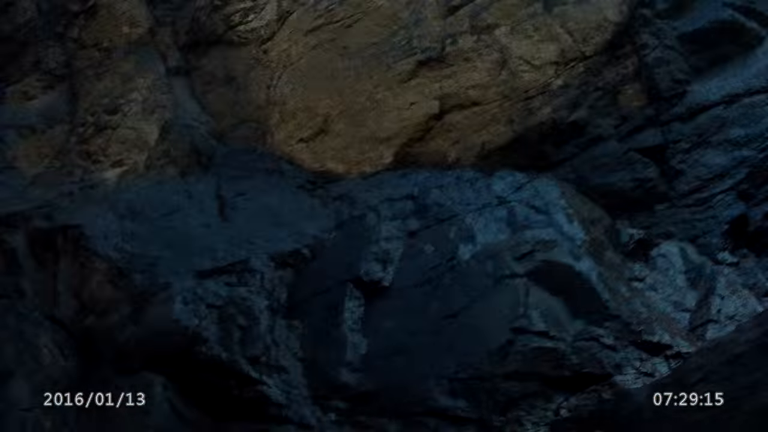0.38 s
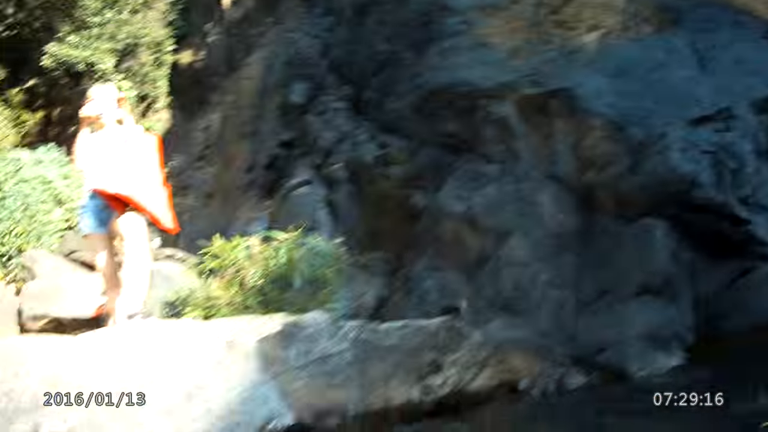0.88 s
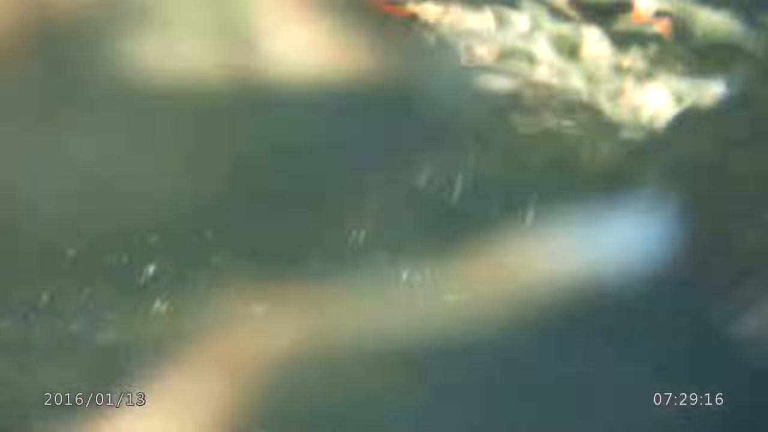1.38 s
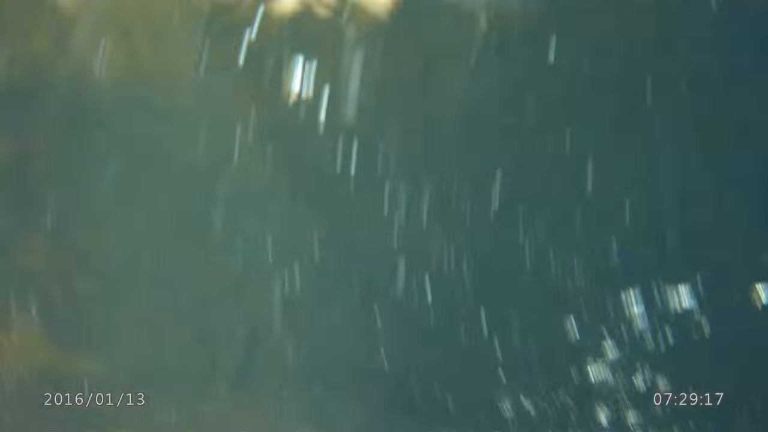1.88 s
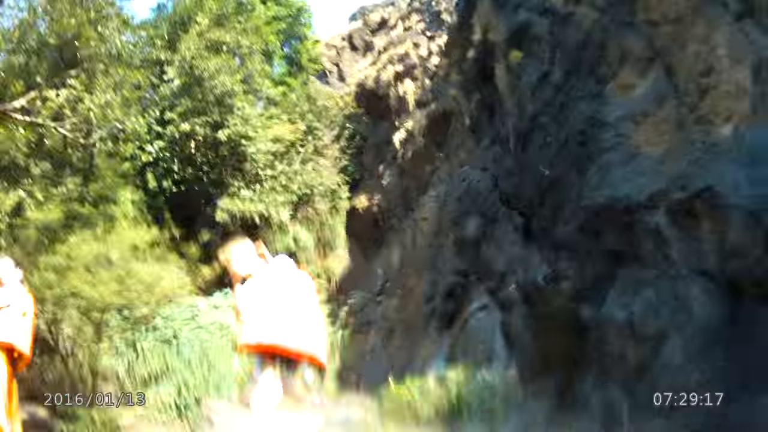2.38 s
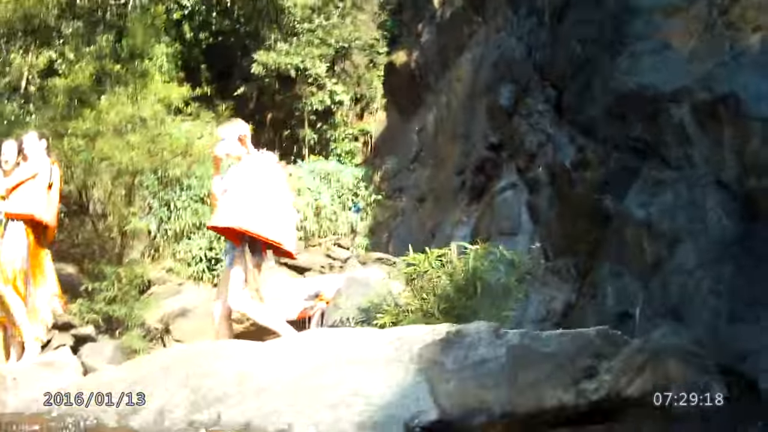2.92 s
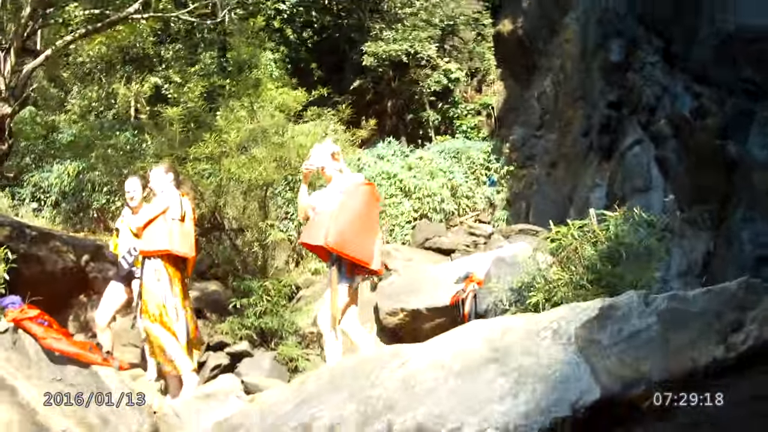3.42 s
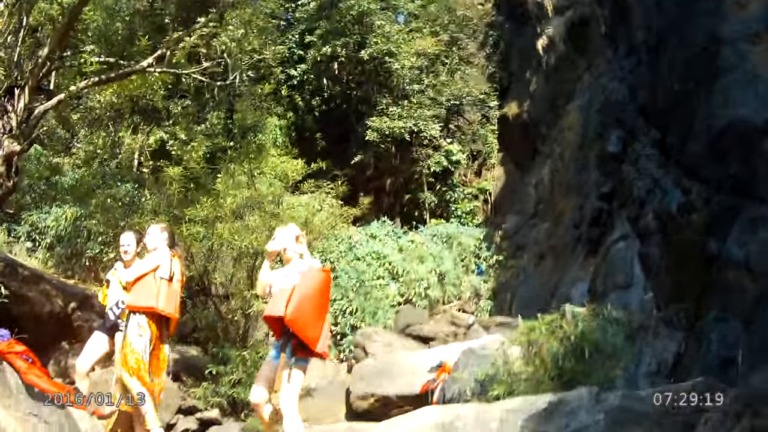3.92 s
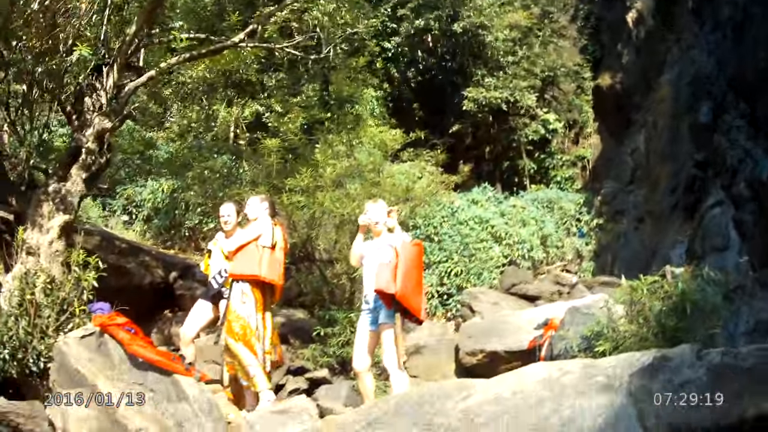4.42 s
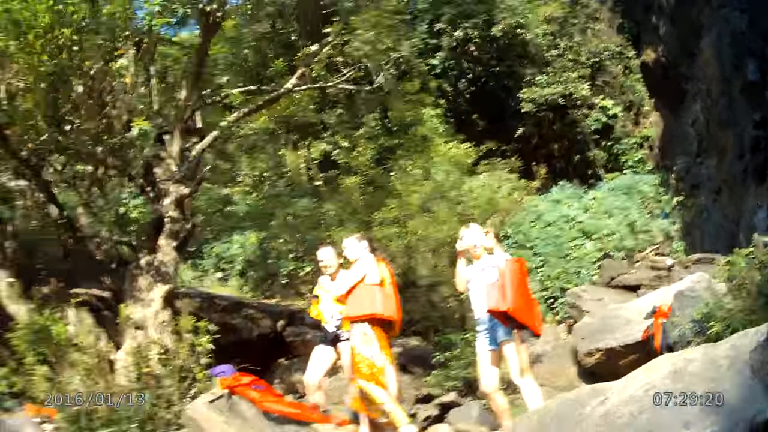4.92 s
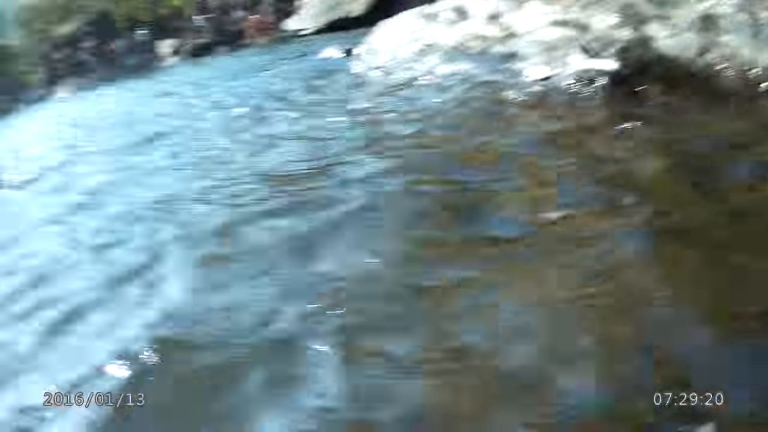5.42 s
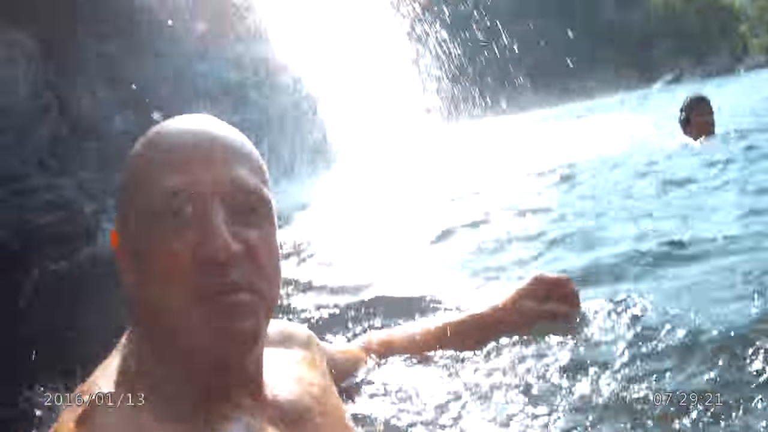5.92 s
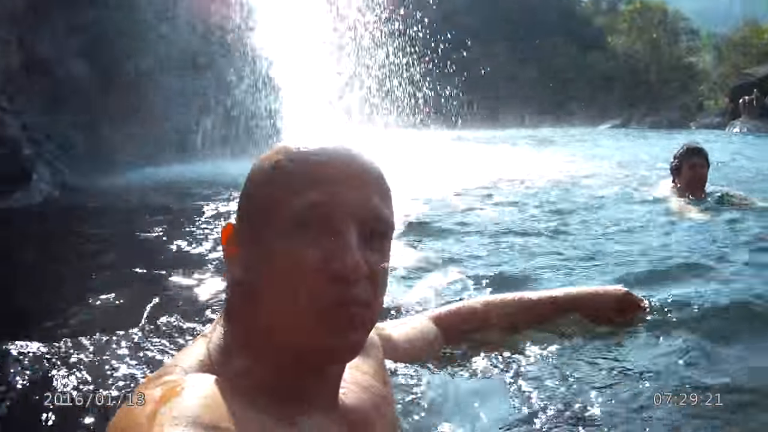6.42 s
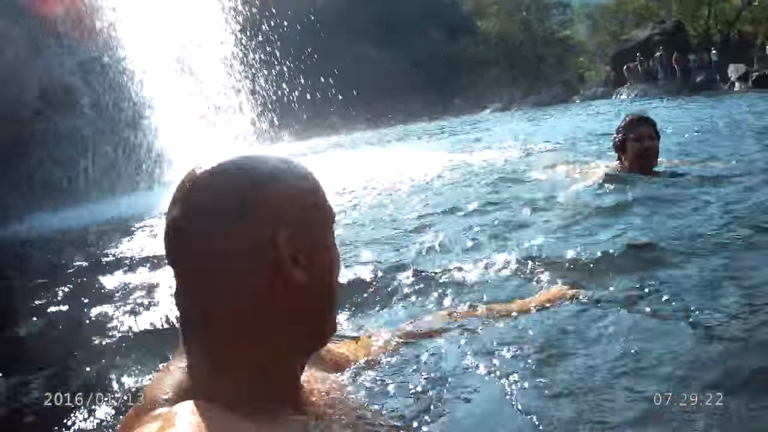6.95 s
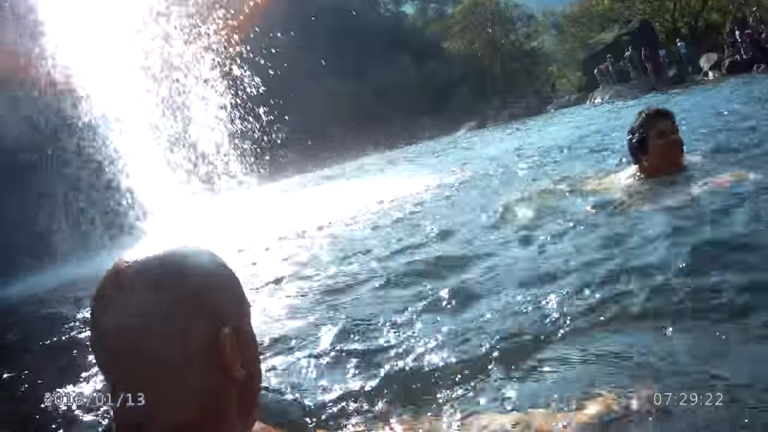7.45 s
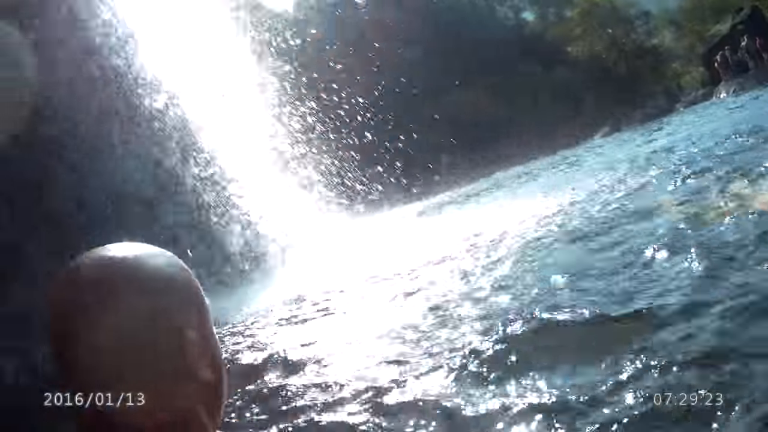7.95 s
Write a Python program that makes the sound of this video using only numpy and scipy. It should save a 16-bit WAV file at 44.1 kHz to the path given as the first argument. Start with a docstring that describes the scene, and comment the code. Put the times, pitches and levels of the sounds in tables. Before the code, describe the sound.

A waterfall roars steadily through a sealed camera case, which dips underwater in distorted gurgling bubbles, surfaces, then gets knocked and slapped by wavelets.

```python
"""A waterfall roars at a small camera in a sealed case, held at the surface of a pool.
The camera dips under for a second among bubbles, the hand shifts on the case, and it turns to face the fall.
The fall is shaped noise, water is crowds of dying sines, and drops and fingers are bursts and rings.
The case colours the fall, the fizz and the cracks with its resonances; the one microphone overloads hard."""
import sys
import numpy as np
from scipy import signal
from scipy.io import wavfile
from scipy.ndimage import uniform_filter1d

SR = 44100
rng = np.random.default_rng(int(sys.argv[2]) if len(sys.argv) > 2 else 0)


def unload_audio(sound):
    """Save the sound as a 16-bit wav file, at the path given as the first command line argument."""
    columns = np.transpose(np.atleast_2d(sound))
    # keep every value between -1 and 1, then stretch to whole-number steps
    steps = np.round(np.clip(columns, -1, 1) * 32767)
    wavfile.write(sys.argv[1], SR, steps.astype(np.int16))


N = 356019  # length in samples


def gain_of(db):
    """Decibels to gain."""
    return 10 ** (np.asarray(db) / 20)


def evened(x):
    """Scales to unit rms."""
    return x / np.sqrt(np.mean(x ** 2) + 1e-20)


def curve(rows, t):
    """Columns of a table joined by straight lines in time."""
    s, *columns = np.transpose(rows)
    return [np.interp(t, s, column) for column in columns]


def add(mix, s, sound):
    """Mixes a sound in at time s."""
    part = mix[round(s * SR):][:len(sound)]
    part += sound[:len(part)]


def band(x, lo_hz, hi_hz, order=2):
    """Butterworth band-pass."""
    edges_hz = [lo_hz, min(hi_hz, SR / 2.1)]
    return signal.sosfilt(signal.butter(order, edges_hz, "band", fs=SR, output="sos"), x)


# Resonances of the case, with a level for each way it is held:
# pitch_hz, width_hz, rock_db_per_hz, bank_db_per_hz, swinging_db_per_hz, facing_db_per_hz
CASE_RESONANCES = [(858, 205, -88, -82, -68.5, -77), (985, 240, -94, -104, -93, -69.5),
                   (1637, 219, -66.5, -65, -65, -66), (1878, 218, -94, -75, -56, -60.5),
                   (2097, 210, -71.5, -78, -93, -91), (2450, 73, -76, -83, -73, -94),
                   (3056, 580, -126, -77, -118, -148), (3400, 307, -70, -72, -75, -75.5),
                   (3926, 320, -88, -77, -93, -80), (4700, 520, -80.5, -74.5, -79, -79),
                   (5550, 400, -83, -81, -78.5, -73.5), (6300, 450, -83, -96, -77, -72.5),
                   (7700, 630, -88, -85.5, -101, -100), (8840, 1120, -72.5, -81, -77, -78),
                   (9500, 1100, -91.5, -83, -77, -76.5), (10860, 1230, -111, -86.5, -88, -87.5)]
# Smooth response under and between the resonances: pitch_hz, level_db_per_hz
CASE_BASE = [(30, -78), (80, -83), (150, -82.5), (500, -78), (1200, -83), (2300, -90.5), (7000, -85.5),
             (11800, -99), (15300, -101)]


def case_power(turn, hz):
    """Power per Hz passed by the case at one turn: resonance peaks over a smooth base."""
    base_hz, base_db = np.transpose(CASE_BASE)
    power = gain_of(2 * np.interp(np.log(hz + 1), np.log(base_hz), base_db))  # twice the dB: power
    for row in CASE_RESONANCES:
        detune = 2 * (hz - row[0]) / row[1]
        power = power + gain_of(2 * row[2 + turn]) / (1 + detune ** 2) ** 1.63
    return power


def through_case(x):
    """Rings a signal through the banked case with a minimum-phase filter, so no ring precedes its blow."""
    log_gain = 0.5 * np.log(case_power(turn=1, hz=abs(np.fft.fftfreq(4096, 1 / SR))))
    taps = np.fft.ifft(np.exp(np.conj(signal.hilbert(log_gain)))).real[:1024]
    return signal.oaconvolve(x, taps)[:len(x)]


# The fall heard through the case; turn runs 0 rock, 1 bank, 2 swinging round, 3 facing the fall:
# time_s, level_db, treble_tilt_db_per_octave, turn
FALL_PATH = [(0, -1.5, 1, 0.27), (1.1, 0.5, -0.5, 0.97), (1.65, 2, -11, 1.5), (2.08, -11, -3.5, 1),
             (2.45, -2.5, -0.5, 1.06), (2.6, -1.5, -0.5, 1.05), (4.3, 0.5, -0.5, 0.8), (5.4, 1.5, 0, 1.06),
             (5.95, 0.5, 1, 0.98), (6.15, 0.5, 1, 1.4), (7.05, -1, .7, 2.1), (7.07, 0, 1, 2.85),
             (7.9, -0.5, 0.5, 2.97), (8.08, -2, 3, 3)]


def waterfall():
    """Random short-time spectra; the colour follows the turn of the case, with soft patches and flicker."""
    size, hop = 1024, 256
    frames, hz = N // hop + 5, np.fft.rfftfreq(size, 1 / SR)
    real, imaginary, patches = rng.standard_normal((3, frames, len(hz)))
    noise = real + 1j * imaginary
    patches = evened(uniform_filter1d(uniform_filter1d(patches, 10, axis=0), 14, axis=1))

    frame_s = np.arange(frames) * hop / SR
    level_db, tilt_db, turn = (c[:, None] for c in curve(FALL_PATH, frame_s))
    power = 0
    for k in range(4):  # crossfade between neighbouring turns
        share = np.clip(1 - abs(np.clip(turn, 0, 3) - k), 0, 1)
        power = power + share * case_power(k, hz)

    tilt_top_hz = np.where(tilt_db > 0, 5600, 15000)  # brightening stops at the presence band
    octaves = np.log2(np.clip(hz, 500, tilt_top_hz) / 2000)
    field_db = level_db + tilt_db * octaves + 1.5 * patches
    coloured = noise * np.sqrt(power * SR / 2) * gain_of(field_db)
    white, roar = signal.istft([noise.T, coloured.T], nperseg=size, noverlap=size - hop)[1]

    flicker = uniform_filter1d(uniform_filter1d(rng.standard_normal(N), 400), 400)
    flicker_db = 0.87 * evened(flicker)
    return roar[:N] / white.std() * gain_of(flicker_db)


# Hand and swell pressing on the case, the steady part: time_s, push_db, thud_above_push_db
STEADY_SWAY = [(0, -29.5, -21), (1.1, -33, -19), (1.3, -22.5, 5.5), (1.7, -25, 0), (1.95, -27.5, -15),
               (2.3, -29, -3.5), (2.7, -35, -17.5), (3.6, -31, -20.5), (4.8, -38.5, -15),
               (5.2, -24.5, -15.5), (6.1, -26.5, -16.5), (6.3, -34.5, -21), (8.07, -43.5, -19)]
# Single heaves of the case: peak_s, push_db, thud_db
CASE_HEAVES = [(.95, -36, -34), (1.181, -27, -15), (1.46, -12, -9), (1.56, -30, -19), (2.08, -36, -19.5),
               (2.88, -29, -45), (3.25, -40, -36), (3.38, -29.5, -21), (5.08, -44, -40), (5.3, -16, -35),
               (5.61, -10, -30), (5.86, -18, -33)]


def sway():
    """Slow pressure swings below hearing and a nearer thud riding on them; both leap at each heave."""
    heave_s, thud_s = 0.047, 0.021  # half widths, to 1/e
    t = np.arange(N) / SR
    push_db, thud_db = curve(STEADY_SWAY, t)
    push, thud = rng.standard_normal((2, N))
    push = band(push, 2.68, 16.6, order=3)
    # Hold the swings near one size over a sixth of a second
    push = push / np.sqrt(uniform_filter1d(evened(push) ** 2, size=SR // 6) + 0.05)
    thud = band(thud, 25.6, 67.0)

    push_size, thud_size = gain_of(push_db), gain_of(push_db + thud_db)
    for s, heave_push_db, heave_thud_db in CASE_HEAVES:
        push_size = push_size + gain_of(heave_push_db) * np.exp(-((t - s) / heave_s) ** 2)
        thud_size = thud_size + gain_of(heave_thud_db) * np.exp(-((t - s) / thud_s) ** 2)
    return push_size * evened(push) + thud_size * evened(thud)


def crack(t60_s):
    """A short wide burst of peak 1: mostly rung through the case, a little straight through."""
    t = np.arange(int(SR * 0.06)) / SR
    burst = rng.standard_normal(len(t)) * gain_of(-60 * t / t60_s)
    burst = evened(through_case(burst)) + 0.42 * evened(burst)
    return burst / abs(burst).max()


def ring(hz, rise_ms, fall_ms, glide):
    """One tone, envelope peak 1, that swells by 8 dB in rise_ms and dies by 8 dB in fall_ms as it glides."""
    ms = np.arange(-3 * rise_ms, 6 * fall_ms, 1000 / SR)
    shape_db = -8 * np.where(ms < 0, (ms / rise_ms) ** 2, abs(ms / fall_ms) ** 0.97)
    cycles = hz * ms / 1000 * (1 + glide * ms / fall_ms)
    return np.sin(2 * np.pi * cycles) * gain_of(shape_db)


# Fingers and stray drops knocking on the case: start_s, crack_db, ring_db, ring_hz, shove_db
CASE_KNOCKS = [(0.946, -28, -42, 128, -47), (2.48, -23.5, -28, 870, -42), (2.497, -23, -33, 700, -50),
               (2.77, -38, -30, 3700, -53), (2.868, -42, -32, 316, -29), (3.234, -19.5, -27, 520, -48),
               (3.349, -26, -25, 700, -42), (3.356, -22, -10.5, 1650, -39), (3.371, -4.5, -12, 4700, -15.5),
               (3.374, -39, -17, 597, -35), (3.489, -41, -26, 145, -47), (4.053, -34, -22, 1690, -44),
               (5.05, -28, -28, 580, -27), (5.062, -14.5, -21, 1650, -28), (5.118, -23, -23, 940, -31),
               (5.219, -45, -18, 90, -38), (5.246, -29, -12.5, 1720, -5.5), (5.514, -18, -26, 490, -21),
               (5.625, -16.5, -22, 9150, -38), (5.637, -19, -6.5, 9600, -38), (5.651, -18, -26, 8900, -38),
               (5.662, -16, -23, 1430, -34), (5.67, -25, -14, 530, -33), (5.703, -21.5, -21, 9500, -40),
               (5.766, -32, -30, 405, -38), (5.86, -15.5, -19, 1760, -30), (6.167, -28, -21, 636, -51),
               (6.24, -36, -26, 600, -49), (6.68, -40, -31, 3230, -56), (7.058, -22, -9, 4930, -56),
               (7.382, -21, -28, 3240, -54)]


def knocks():
    """A finger or drop lands: a crack, a ring of the wall, and a shove of air that jumps up and swings back."""
    out = np.zeros(N)
    u = np.arange(int(SR * 0.1)) / SR / 0.017  # time in units of 17 ms
    shove = (1 - u ** 2 / 4.1) * np.exp(-u ** 2 / 2.6) * (1 - np.exp(-u / 0.046))
    for s, crack_db, ring_db, hz, shove_db in CASE_KNOCKS:
        fall_ms = 1.74 * (hz / 1000) ** -0.52  # a higher ring dies faster
        add(out, s, gain_of(crack_db) * crack(t60_s=0.022))
        add(out, s, gain_of(ring_db) * ring(hz, rise_ms=0.395, fall_ms=fall_ms, glide=0))
        add(out, s, gain_of(shove_db) * shove)
    return out


# The largest drops ticking on the case, level before the lift and band-pass: start_s, level_db
DROP_TICKS = [(1.1445, -2.5), (1.1703, 3), (1.2268, -14), (1.253, -20), (1.2709, -12), (1.309, -10),
              (1.3415, -1), (1.3897, -8.5), (1.421, -17), (1.464, 2), (1.524, -15), (1.547, -8),
              (1.585, -17), (1.6, -11), (1.693, -14.5), (1.798, -23), (1.841, -26), (1.851, -20),
              (1.873, -19), (1.886, -20), (1.916, -16), (2.01, -18), (2.0446, -14), (2.081, -20),
              (2.0893, -8), (2.105, -21), (2.123, -24), (2.1389, 2), (2.1893, -19), (2.223, -21),
              (2.235, -9), (2.2593, -14.5), (2.274, -25), (2.3283, -18)]


def ticks():
    """A drop cracks across the treble: a very short burst through the case, band-passed."""
    lift_db = 5.0
    out = np.zeros(N)
    for s, db in DROP_TICKS:
        add(out, s, gain_of(db + lift_db) * band(crack(t60_s=0.011), 1280, 10800))
    return out


def grains(lo_hz, hi_hz, cycles, per_s, spread_db):
    """A random crowd of small bubbles: dying sines that glide up, a few much larger than the rest."""
    out = np.zeros(N)
    pitches = 16
    for hz in np.geomspace(lo_hz, hi_hz, num=pitches):
        u = np.arange(int(4 * cycles * SR / hz)) * hz / SR  # time in cycles
        tone = np.sin(2 * np.pi * u * (1 + 0.034 * u / cycles))
        bubble = tone * np.exp(-u / cycles) * (1 - np.exp(-u / 0.42))
        when, size, sign = rng.random((3, N))
        sizes = gain_of(-spread_db * np.log(size + 0.0037))
        train = (when < per_s / pitches / SR) * sizes * np.sign(sign - 0.5)
        out += signal.oaconvolve(train, bubble * np.sqrt(hz))[:N]
    return evened(out)


# Air boiling out round the case while it is under:
# time_s, gurgle_db, small_bubbles_above_gurgle_db, fizz_above_gurgle_db
BOIL = [(1.13, -46, -17, 16), (1.17, -31, 8, 13), (1.19, -23.5, -6.5, -3), (1.236, -18.5, -9, -4.5),
        (1.265, -32, 0, 5), (1.316, -10, -21.5, -11.5), (1.348, -27.5, 8.5, 7), (1.385, -21.5, -7.5, -11.5),
        (1.404, -6.5, -12, -9.5), (1.47, -1.5, -11, -19), (1.51, -8, -2, -10), (1.612, -4, -7.5, -17.5),
        (1.658, -26, 4, 1), (1.72, -25.5, 6, -18.5), (1.785, -26, 4, -22), (1.8, -27, 11.5, -1.5),
        (1.886, -29, 4.5, 5.5), (1.956, -40, 8.5, -8), (2.04, -23, 1.5, -16), (2.1, -25, 8.5, -5),
        (2.2, -31, 14, 14.5), (2.27, -29.5, -14, -5.5), (2.42, -33.5, -16, -11.5), (2.62, -57.5, 20.5, 24),
        (2.8, -58, -2, 16)]
# Wavelets slapping the case, levels before the slap's envelope: start_s, gurgle_db, small_bubbles_db, fizz_db
WAVELET_SLAPS = [(5.044, -33, -33, -37), (5.115, -36, -30.5, -36), (5.24, -25, -33, -56),
                 (5.37, -47, -40.5, -41), (5.511, -43, -37.5, -42), (5.579, -44, -35, -33),
                 (5.62, -40, -34, -36), (5.665, -37.5, -37, -49), (5.7, -46, -44, -36.5),
                 (5.83, -42, -37, -28), (5.854, -44, -35, -26.5), (5.889, -53, -41, -57),
                 (6.15, -48, -32.5, -42), (6.22, -52, -39.5, -40)]


def dunk():
    """Water closes over the case or slaps it: low gurgle, small bubbles and a fizz of droplets."""
    t = np.arange(N) / SR
    low = evened(band(grains(82.6, 210, cycles=2.33, per_s=200, spread_db=3.5), 72, 700))
    middle = grains(247.9, 1182, cycles=4.2, per_s=350, spread_db=3.0)
    fizz = evened(through_case(grains(1417, 13800, cycles=3.7, per_s=1100, spread_db=3.5)))

    low_db, middle_db, fizz_db = curve(BOIL, t)
    inside = np.clip(np.minimum(t - BOIL[0][0], BOIL[-1][0] - t) / 0.066, 0, 1)  # 66 ms fades
    boil = low + gain_of(middle_db) * middle + gain_of(fizz_db) * fizz
    out = inside * gain_of(low_db) * boil

    rise_s, t60_s = 0.0095, 0.28
    after_s = np.arange(SR // 2) / SR
    shape = np.minimum(after_s / rise_s, 1) * gain_of(-60 * after_s / t60_s)
    layers = np.array([low, middle, fizz])
    for s, *levels_db in WAVELET_SLAPS:
        water = layers[:, round(s * SR):][:, :len(shape)]
        add(out, s, shape * (gain_of(levels_db) @ water))
    return out


# The largest single bubbles and rings of the case: peak_s, peak_db, pitch_hz, fall_ms
BUBBLES_AND_RINGS = [(1.1457, -0.5, 6560, 0.6), (1.1485, 2, 1780, 2.5), (1.172, -8, 9200, 0.48),
                     (1.176, -12, 5300, 1.5), (1.1815, -0.5, 4400, 0.83), (1.185, -11, 131, 5),
                     (1.1865, -12.5, 1690, 3.7), (1.208, -20, 2880, 1.5), (1.231, -9.5, 151, 7.5),
                     (1.2199, -13.5, 3350, 2.3), (1.273, -13, 5150, 1.6), (1.2719, 10, 1680, 2.9),
                     (1.2941, 4, 1380, 0.36), (1.299, -8, 1200, 3.7), (1.312, -3.5, 109, 5.4),
                     (1.321, -6.5, 9500, 1.1), (1.333, -5.5, 1720, 1.5), (1.3425, 3, 8280, 1),
                     (1.3431, 3, 499, 4.3), (1.3542, -9, 4700, 1.5), (1.3748, -9.5, 3400, 2),
                     (1.381, -12, 900, 1.5), (1.402, 1.5, 152, 10), (1.4035, -7.5, 2020, 1.8),
                     (1.4223, -17, 4200, 1.7), (1.435, 5.5, 105, 9.6), (1.4406, -4.5, 2322, 0.86),
                     (1.444, -3.5, 860, 1.9), (1.4571, -5, 3120, 1.9), (1.464, 4, 8600, 0.54),
                     (1.479, -7.5, 2480, 1.8), (1.491, -1, 248, 11), (1.544, -7, 1730, 3.5),
                     (1.562, 5.5, 124, 7), (1.5875, -13, 3260, 2), (1.602, -5.5, 4340, 0.9),
                     (1.607, 3, 98, 7.8), (1.6152, -8, 1510, 2.2), (1.63, -4, 3280, 0.86),
                     (1.6303, -7, 745, 3.1), (1.636, 0, 1617, 3.4), (1.653, 0, 1700, 0.39),
                     (1.6946, -14.5, 3210, 1.4), (1.738, 3, 662, 3.4), (1.755, -19, 640, 9.6),
                     (1.797, -11.5, 3320, 0.99), (1.7991, -2.5, 1850, 0.67), (1.8249, -3, 770, 2.2),
                     (1.831, -10.5, 534, 6.7), (1.873, -13.5, 3480, 4.1), (1.8805, -4, 1810, .8),
                     (1.944, -20, 638, 9.9), (1.963, -29, 3400, 2.2), (1.992, -21, 1300, 3.4),
                     (2.001, -4.5, 384, 3.4), (2.048, 6, 599, 4), (2.0493, -4.5, 3670, .5),
                     (2.0506, 0.5, 1640, 1.3), (2.0835, -1.5, 1760, 2.8), (2.089, -9, 490, 2.6),
                     (2.1097, -4, 3200, 2.2), (2.1102, -9, 1640, 2.9), (2.133, -7, 1414, 6.9),
                     (2.1407, -3, 9950, .6), (2.1464, 4.5, 1840, 1.1), (2.1518, 1.5, 1690, 5.9),
                     (2.18, 5.5, 1606, 2), (2.195, -9, 1480, 2), (2.2203, -1, 1890, .7),
                     (2.2364, -5, 8550, .5), (2.2466, -15.5, 3050, .8), (2.261, -14.5, 8800, .7),
                     (2.297, -24, 181, 8), (2.322, -22, 120, 9), (2.33, -13, 6150, 1),
                     (2.3448, -13, 8700, 0.43), (2.347, -18, 257, 7.7), (2.401, -29, 130, 9),
                     (2.434, -29, 139, 9)]


def bubbles_and_rings():
    """Each bubble or ring of the case sounds briefly at its own pitch, gliding up slightly."""
    out = np.zeros(N)
    for s, db, hz, fall_ms in BUBBLES_AND_RINGS:
        rise_ms = 1.75 * (hz / 1000) ** -0.52  # a higher pitch swells faster
        start_s = s - 3 * rise_ms / 1000
        add(out, start_s, gain_of(db) * ring(hz, rise_ms, fall_ms, glide=0.01))
    return out


def scene():
    """One microphone feeds both channels."""
    mono = waterfall() + sway() + knocks() + ticks() + dunk() + bubbles_and_rings()
    return np.array([mono, mono])


def band_limit(x):
    """A steep low-pass at the top of the band."""
    return signal.sosfilt(signal.butter(12, 16250, fs=SR, output="sos"), x)


# Narrow notch in the microphone's sound: pitch_hz, width_hz
MIC_NOTCH = (7900, 330)


def record(dry):
    """The microphone chain: low cut, hard overload at full scale, a narrow notch and a treble limit."""
    low_cut_hz, treble_edge_hz = 3.8, 15280
    cut = signal.sosfilt(signal.butter(1, low_cut_hz, "high", fs=SR, output="sos"), dry)
    overloaded = np.clip(cut, -1, 1)
    notch_hz, notch_width_hz = MIC_NOTCH
    notched = signal.lfilter(*signal.iirnotch(notch_hz, notch_hz / notch_width_hz, SR), overloaded)
    edge = signal.firwin(511, treble_edge_hz, window=("kaiser", 7), fs=SR)
    limited = signal.oaconvolve(notched, edge[None], "same")
    return band_limit(np.clip(limited, -1, 1))


dry = scene()
out = record(dry)
unload_audio(out)
```